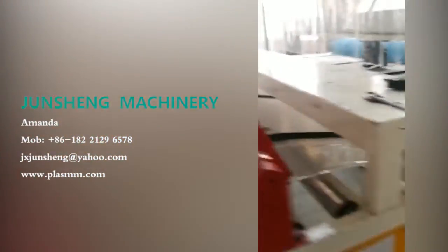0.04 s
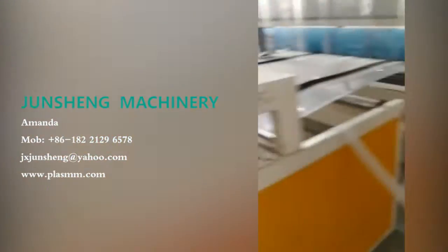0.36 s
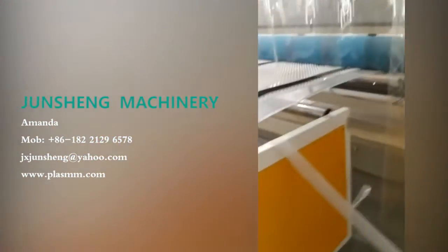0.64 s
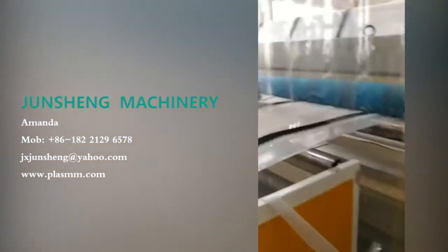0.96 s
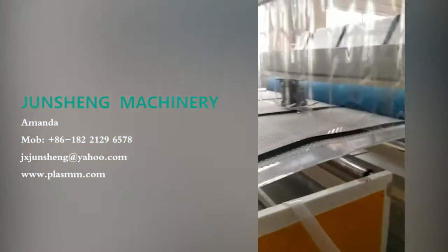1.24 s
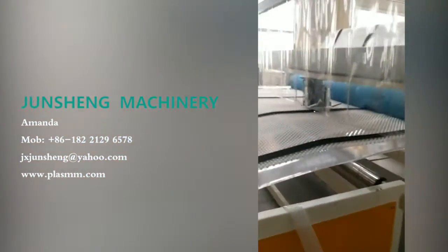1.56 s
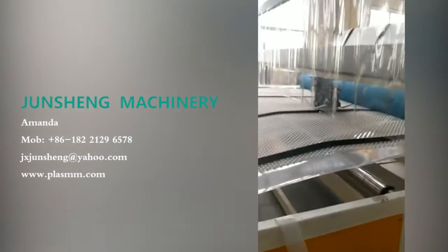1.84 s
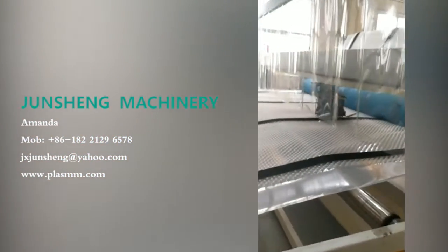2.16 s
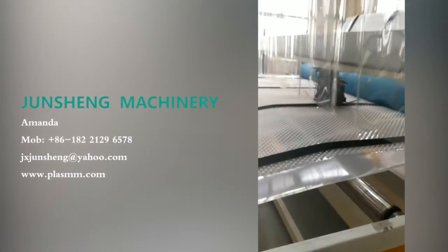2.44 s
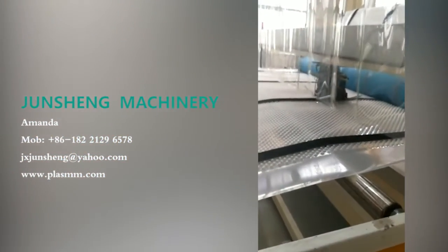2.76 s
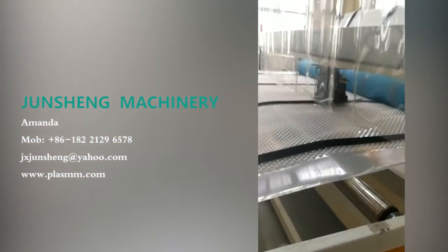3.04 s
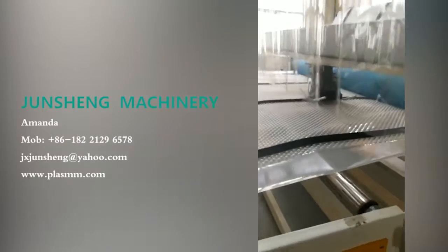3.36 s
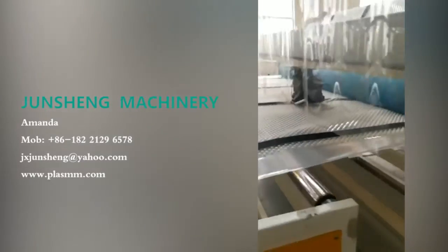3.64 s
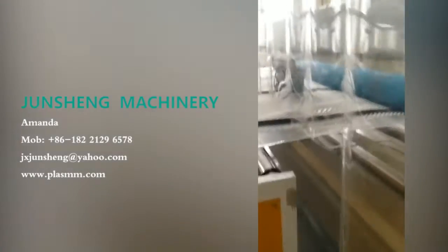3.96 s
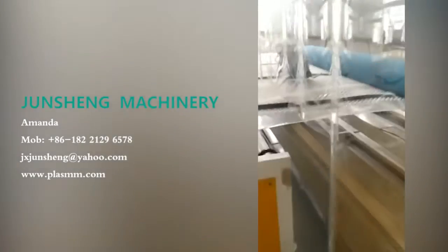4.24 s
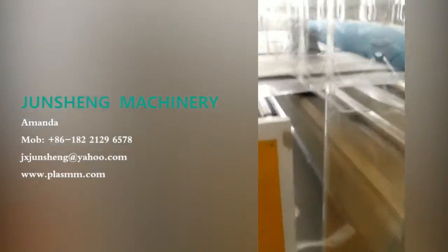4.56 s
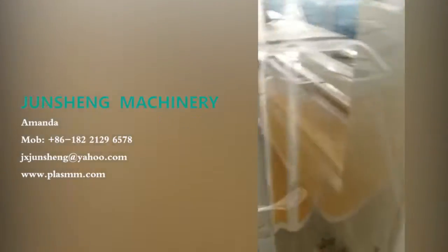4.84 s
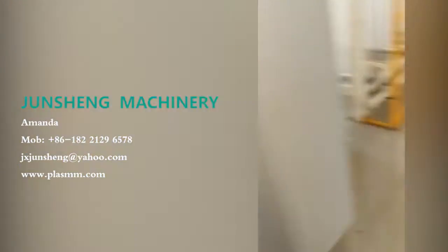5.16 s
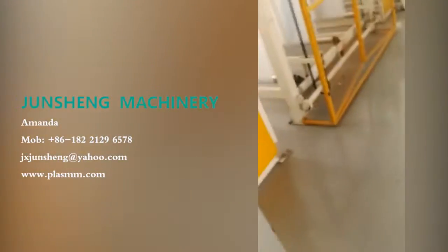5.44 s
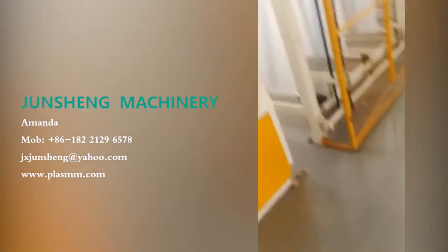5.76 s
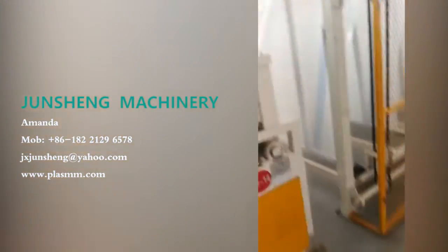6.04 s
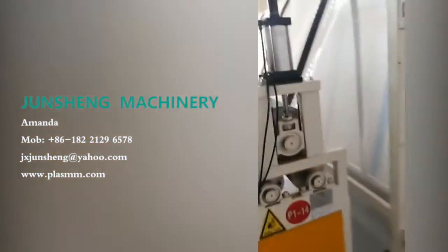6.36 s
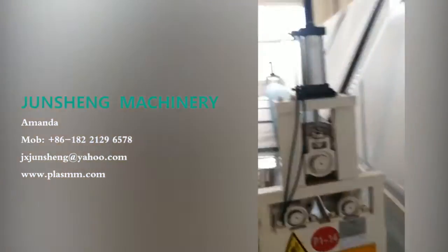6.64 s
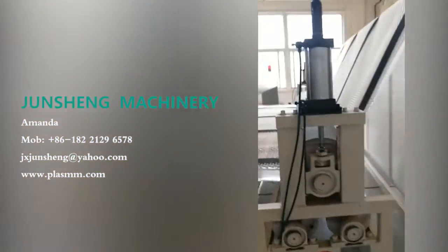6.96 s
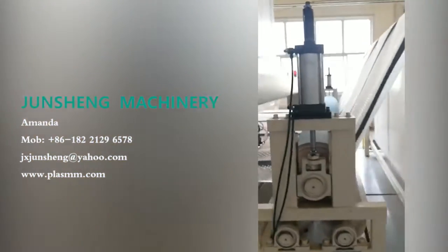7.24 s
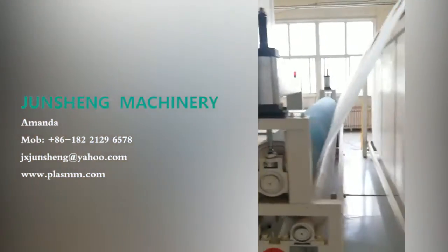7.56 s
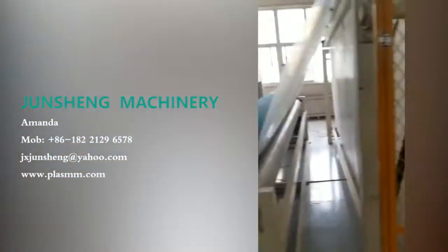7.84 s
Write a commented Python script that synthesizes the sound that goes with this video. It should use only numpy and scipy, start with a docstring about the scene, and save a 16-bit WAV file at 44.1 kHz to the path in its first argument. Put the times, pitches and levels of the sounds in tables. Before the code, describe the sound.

A machine making plastic sheet runs in a factory hall for about eight seconds, heard from a phone carried alongside it, a little louder on the left. From the start, fans roar evenly and the sheet hisses with a fine crinkle as it peels off rollers. Underneath, the machine's body rumbles, a gearbox drones with a slight throb and motors hum. A thin, slightly rough high whine continues throughout, flickering in strength and shifting between left and right. Dull knocks come at about 0.2, 0.6 and 1.7 seconds, with the loudest at 3.2. A blower tone swells around three seconds, and a guard rings briefly near four as the drone grows. At about five seconds the microphone turns away and the hiss drops clearly. Softer knocks follow near 5.6 and 6.2 seconds, while the roar, hum and whine carry on to the end.

```python
"""A phone is carried along a machine that makes plastic sheet in a factory hall. From the start, fans
roar, the sheet hisses and crinkles over rollers, the frame rumbles, a gearbox drones, motors hum and a
drive whines thinly. A few dull knocks follow, the loudest just after three seconds. Near four seconds
a guard rings, then the phone passes a side panel. At about five seconds it turns away from the sheet,
so the hiss drops while the machines run on."""
import sys
import numpy as np
from scipy import signal
from scipy.fft import rfft, irfft
from scipy.io import wavfile
from scipy.ndimage import uniform_filter1d

SR = 44100
rng = np.random.default_rng(int(sys.argv[2]) if len(sys.argv) > 2 else 0)


def unload_wav(signal):
    """Save mono or channel-first audio to the path in sys.argv[1] as 16-bit WAV at rate SR, clipped to [-1, 1]."""
    wavfile.write(
        sys.argv[1],
        SR,
        np.round(np.clip(np.atleast_2d(signal).T, -1, 1) * 32767).astype(np.int16),
    )


N = 348390
T = np.arange(N) / SR
BINS = np.arange(N // 2 + 1) * SR / N  # the frequencies of a spectrum, in Hz
SIDES = np.array([[1], [-1]])  # left, right
TOP_HZ = 7500

# How alike the two microphones hear the hall. Each row: frequency in Hz, likeness (1 same, -1 opposite).
LIKENESS = [(30, 1), (110, 1), (140, .998), (190, .988), (280, .85), (380, .5), (450, 0), (530, -.46),
            (660, -.38), (900, .05), (1350, .37), (1750, .15), (2050, -.15), (2500, -.22), (3000, .2),
            (3450, .22), (4000, -.12), (5000, .02)]
# How much louder the left side is. Each row: frequency in Hz, left minus right in dB.
LEAN = [(180, 0), (310, .6), (500, 2), (620, 3.6), (1100, 1.5), (1700, 4), (3000, 4.7), (3800, 4.3),
        (5000, 5), (7500, 4.6)]


def undb(db):
    """Turn decibels into a number to multiply by."""
    return 10 ** (np.asarray(db) / 20)


def curves(table):
    """Join the points of a time table with straight lines, one value a sample."""
    s, *columns = np.transpose(table)
    return np.squeeze([np.interp(T, s, c) for c in columns])


def at(table, hz):
    """Look up a frequency table, giving every octave the same width."""
    f, value = np.transpose(table)
    return np.interp(np.log(hz + 1e-9), np.log(f), value)


def unit(x):
    """Scale a signal to an average power of 1."""
    return x / np.sqrt(np.mean(x ** 2))


def walk(rate):
    """A smooth random wobble of size 1, moving up to about rate times a second."""
    smoothing = np.exp(-(BINS / rate) ** 2 / 2)
    return unit(irfft(rfft(rng.standard_normal(N)) * smoothing, N))


def in_hall(pair, gain):
    """Blend two noises into one hall sound: shaped by gain, alike in the bass, louder on the left."""
    mid, side = rfft(pair) * gain
    alike = np.clip(at(LIKENESS, BINS), -1, 1)
    both = mid * np.sqrt(1 + alike) + SIDES * side * np.sqrt(1 - alike)
    return unit(irfft(both * undb(SIDES * at(LEAN, BINS) / 2), N))


def turbulence(colour, flutter_db, rate):
    """A rushing noise in which each octave flutters on its own."""
    octave = np.log2(np.maximum(BINS, 1) / TOP_HZ)
    white, out = rfft(rng.standard_normal((2, N))), 0
    for k in range(9):
        band = irfft(white * np.maximum(1 - abs(octave + k), 0), N)
        out = out + band * undb(flutter_db * walk(rate))
    return in_hall(out, undb(at(colour, BINS)))


def tone(hz, scatter, rate, spread=1):
    """A steady tone plus its echoes, whose sum shifts as the phone moves."""
    mid, side = (1 + scatter * (walk(rate) + 1j * walk(rate)) for _ in range(2))
    alike = np.clip(at(LIKENESS, hz), -1, 1)
    both = mid * np.sqrt(1 + alike) + 1j * SIDES * spread * side * np.sqrt(1 - alike)
    carrier = np.exp(2j * np.pi * (hz * T + rng.random()))
    return unit((both * carrier).real * undb(SIDES * at(LEAN, hz) / 2))


def swelling(swells, rest_db, rest_lean_db):
    """A tone's left and right gain as the phone crosses the loud and quiet spots of standing waves."""
    gain = undb(rest_db + SIDES * rest_lean_db / 2)
    for s, length_s, db, lean_db in swells:
        inside = np.exp2(-np.abs(2 * (T - s) / length_s) ** 3)
        target = undb(db) * unit(undb(SIDES * lean_db / 2))
        gain = gain + inside * (target - gain)
    return gain


def fans(low_db=-30.5, split_hz=410):
    """Cooling fans fill the hall with an even roar; only its upper part changes as the phone moves."""
    # The roar's tone colour. Each row: frequency in Hz, relative strength in dB.
    colour = [(25, -7), (60, 1.5), (150, -1.5), (330, 0), (410, 5.5), (510, -0.5), (620, 3.5), (730, 0.5),
              (900, 2.5), (1400, -1), (2100, -3), (3200, -6), (5500, -10), (7500, -22.5)]
    # The roar's upper part. Each row: time in seconds, level in dB.
    upper_levels = [(0, -29.5), (.6, -30), (1.5, -29.5), (2.7, -30), (3.5, -29), (4.05, -30.5),
                    (4.5, -30.5), (5.1, -32.5), (5.55, -31.5), (5.9, -32), (7.9, -32.5)]
    roar = turbulence(colour, flutter_db=.7, rate=18)
    low = irfft(rfft(roar) / (1 + (BINS / split_hz) ** 6), N)
    return low * undb(low_db) + (roar - low) * undb(curves(upper_levels))


def sheet(facing_db=-30.5, away_db=-40, turn_s=4.82, turn_length_s=0.4,
          crinkles_per_s=120, crinkle_db=-14, fizz_s=0.0028):
    """The sheet hisses and crinkles as it peels off the rollers, more softly once the phone turns away."""
    # The sheet's tone colour. Each row: frequency in Hz, relative strength in dB.
    colour = [(500, -28.5), (1200, -17.5), (2200, -3.5), (3100, 0), (3700, -2), (4400, -5), (5400, -5),
              (5900, -2.5), (6500, 3), (7050, 5.5), (7500, 2)]
    hiss = turbulence(colour, flutter_db=.45, rate=14)
    snaps = (rng.random(N) < crinkles_per_s / SR) * rng.exponential(size=N)
    # each snap leaves a short, fading fizz
    power = signal.lfilter([1], [1, -np.exp(-1 / (fizz_s * SR))], snaps + 1e-18)
    crinkle = in_hall(np.sqrt(power) * rng.standard_normal((2, N)), undb(at(colour, BINS)))
    turned = np.clip((T - turn_s) / turn_length_s, 0, 1)
    db = facing_db + turned * (away_db - facing_db) + .2 * walk(16)
    return (hiss + undb(crinkle_db) * crinkle) * undb(db)


def churning(x, band_hz=130, swell_s=.035):
    """Make a rush sound coarse: narrow bands swell for a moment and sink back, each on its own."""
    # How far the bands swell and fade. Each row: frequency in Hz, typical swing in dB.
    swings = [(300, .6), (550, 1.4), (1000, .7), (1600, 1.3), (2300, 1.8), (4000, 1.8), (7000, 1.3)]
    hz, s, bands = signal.stft(x, SR, nperseg=1024)
    chance = rng.standard_normal((len(hz), len(s)))
    for size, axis in ((round(band_hz / hz[1]), 0), (round(swell_s / s[1]), 1)):
        chance = uniform_filter1d(uniform_filter1d(chance, size, axis=axis), size, axis=axis)
    gain = undb(at(swings, hz)[:, None] * unit(chance))
    gain = gain / np.sqrt(np.mean(gain ** 2, axis=1, keepdims=True))
    return signal.istft(bands * gain, SR)[1][:, :N]


def surfaces(x, delays_s=(.0037, .0083, .0141), sway_s=.00022, echo=0.15):
    """Echoes bounce off the floor and machines; their paths shift as the phone moves."""
    out = x
    for delay_s in delays_s:
        then = T - delay_s - sway_s * walk(0.67)
        out = out + echo * np.array([np.interp(then, T, channel) for channel in x])
    return out


def frame(hum_boost_db=0.2):
    """Rollers shake the frame; hums from shafts and mains power swell with the rumble."""
    # The frame's rumble. Each row: time in seconds, level in dB.
    levels = [(0, -36.5), (.42, -38), (.62, -36.5), (1.68, -36.5), (1.86, -44), (2.35, -37), (3.15, -41),
              (3.8, -43), (4.1, -36), (4.65, -37.5), (4.92, -32.5), (5.1, -39.5), (6.9, -40.5),
              (7.9, -40.5)]
    # Its tone colour. Each row: frequency in Hz, relative strength in dB.
    colour = [(100, -9.5), (150, -6), (190, -2), (280, -1.5), (350, -10.5), (480, -21), (1000, -45.5)]
    # Other machines' hums. Each row: pitch in Hz, base level in dB, share of the rumble's swell (0-1).
    hums = [(48.7, -48.5, 0), (182.3, -49, 1), (222.5, -49.5, .9), (249.5, -53, .8), (264, -53, .5),
            (275.6, -51.5, .5), (336, -54, .5), (599.6, -50.5, .1), (877, -55, 0), (899, -57, 0),
            (1199, -57.5, 0), (1383, -58, 0)]
    db = curves(levels)
    out = turbulence(colour, flutter_db=-0.4, rate=1.3) * undb(db)
    for hz, base_db, share in hums:
        hum_db = base_db + hum_boost_db + share * (db - db.mean())
        out = out + tone(hz, scatter=.4, rate=0.62) * undb(hum_db)
    return out


def gearbox(tones_db=-1, churn_db=-7.0):
    """Turning shafts drone over a dull churn; two close pitches throb against each other."""
    # The whole drone. Each row: time in seconds, level in dB.
    levels = [(0, -39), (.7, -40.5), (1.6, -40), (3.2, -38), (3.6, -34.5), (4.56, -33), (4.72, -44.5),
              (5.55, -40.5), (7.1, -43.5), (7.9, -45)]
    # The shafts' tones. Each row: pitch in Hz, relative level in dB.
    shafts = [(74, -17), (99.6, -7.5), (144.3, -8), (148, -5), (178, -11), (200, -14)]
    # The churn's tone colour. Each row: frequency in Hz, relative strength in dB.
    colour = [(30, -17), (65, -13.5), (100, 1.5), (125, 2), (150, 3), (190, -10), (400, -48)]
    tones = sum(tone(hz, scatter=0.25, rate=2.2) * undb(db) for hz, db in shafts)
    churn = turbulence(colour, flutter_db=0.5, rate=6.9)
    return (undb(tones_db) * tones + undb(churn_db) * churn) * undb(curves(levels))


def motors(motor_hz=299.6, blower_hz=825.6, guard_hz=600):
    """The main motor hums, the blower's blades sing, and together they set a guard ringing."""
    # The magnetic hum, at six times the mains frequency. Each row: time in seconds, level in dB.
    motor_levels = [(0, -47), (.25, -49), (.42, -53), (.6, -37.5), (.74, -31.5), (1.08, -35.5), (1.25, -38),
                    (1.42, -36), (1.53, -37), (1.68, -31), (1.88, -40.5), (2.5, -41.5), (3.2, -38.5),
                    (3.3, -40), (3.6, -55), (3.85, -39), (4.55, -36), (4.8, -33), (4.97, -40.5),
                    (5.15, -38), (5.45, -42.5), (5.58, -51), (5.9, -53), (6.12, -40), (6.55, -41),
                    (6.8, -46), (7.35, -40), (7.62, -37.5), (7.9, -45.5)]
    # How that hum differs left and right. Each row: time in seconds, spread (1 = as from all around).
    motor_spread = [(0, 0.36), (3.5, 1.3), (4.6, .2), (5.2, 0.46), (5.8, 2.3), (7.9, 1.6)]
    # The blower's loud spots.
    # Each row: middle in seconds, length in seconds, level in dB, left minus right in dB.
    blower_swells = [(0.167, 0.2, -46, 21), (.68, .14, -45.5, 10), (1.1, 0.16, -44, -4),
                     (1.462, 0.11, -48, 12), (2.35, 0.091, -39, 0), (2.691, 0.15, -38.5, -7),
                     (3.068, 0.21, -34.5, -1), (3.424, 0.36, -41.5, 3), (3.857, 0.13, -44, -7),
                     (4.169, 0.08, -39, -5), (4.46, 0.3, -43, 12), (4.73, .12, -46, 5),
                     (5.05, .2, -46.5, 1), (5.42, 0.25, -41.5, -5), (5.636, 0.089, -43.5, 16),
                     (5.92, 0.34, -48, -3), (6.74, 0.26, -43, 2), (7.344, 0.15, -40.5, 16),
                     (7.57, 0.2, -47, 12), (7.8, 0.18, -46, 12)]
    # The guard, heard only from close by. Each row: time in seconds, level in dB.
    guard_levels = [(0, -55.5), (3.4, -61), (3.8, -39.5), (4.15, -44), (4.45, -62), (7.9, -52.5)]
    motor = tone(motor_hz, scatter=.16, rate=4.5, spread=curves(motor_spread))
    blower = tone(blower_hz, scatter=.08, rate=12.0)
    guard = tone(guard_hz, scatter=5.9, rate=10.0)
    return (motor * undb(curves(motor_levels))
            + blower * swelling(blower_swells, rest_db=-52, rest_lean_db=0)
            + guard * undb(curves(guard_levels)))


def drive(whine_hz=2659.5, wander_hz=1.524, rough_db=-13, echo_db=-59):
    """The drive's thin, slightly rough whine reaches the microphones out of step, over a wavering echo."""
    # The whine's loud and quiet spots.
    # Each row: middle in seconds, length in seconds, level in dB, left minus right in dB.
    swells = [(0.157, 0.082, -37, 22), (0.237, 0.06, -48, -2), (0.395, 0.077, -38.5, 27),
              (0.564, 0.14, -37, 15), (0.781, 0.12, -44, -8), (1.07, 0.07, -37.5, 18),
              (1.171, 0.077, -34.5, 19), (1.33, .12, -43, 6), (1.544, 0.09, -39, 20),
              (1.735, 0.07, -46, -12), (1.873, 0.097, -42.5, -8), (2.38, 0.22, -43.5, 13),
              (2.613, 0.081, -41.5, 11), (2.729, 0.11, -43, -13), (2.93, 0.11, -43, 5),
              (3.062, 0.099, -37, 15), (3.35, 0.08, -38, 20), (3.44, 0.055, -54, -2), (3.52, 0.07, -43, 14),
              (3.63, 0.05, -52, 0), (3.69, 0.17, -42.5, 21), (3.989, 0.088, -31.5, 28),
              (4.09, 0.1, -36.5, 27), (4.208, 0.08, -48, 6), (4.337, 0.1, -40, -7),
              (4.412, 0.076, -37.5, 17), (4.55, 0.075, -34, 14), (4.633, 0.04, -50, 0),
              (4.734, 0.12, -38, 4), (4.95, 0.084, -41.5, -4), (5.058, 0.08, -52, 9),
              (5.22, 0.18, -39.5, 14), (5.38, .1, -45, -3), (5.536, 0.14, -36.5, 25),
              (5.72, 0.074, -37, -28), (5.843, 0.11, -32.5, 3.5), (5.945, 0.03, -36, -20),
              (6.03, 0.15, -39.5, 25), (6.195, 0.18, -45, -12), (6.31, 0.08, -49, 3),
              (6.375, 0.045, -51, -10), (6.465, 0.11, -37, 12), (6.587, 0.1, -39, 12),
              (6.674, 0.064, -47, -14), (6.767, 0.11, -35, 30), (6.855, .05, -41, 15),
              (6.932, 0.06, -53, 7), (7.07, 0.05, -45, 14), (7.14, 0.09, -37, -25),
              (7.264, 0.09, -34.5, 25), (7.41, 0.072, -54, 5), (7.513, 0.16, -41, 33),
              (7.6, 0.036, -46, -15), (7.7, 0.17, -37, -2), (7.804, 0.06, -40.5, 7), (7.894, 0.05, -39, 18)]
    phase = 2 * np.pi * np.cumsum(whine_hz + wander_hz * walk(1.62)) / SR
    paths = SIDES * 0.45 + 0.65 * walk(2.5)  # radians, from the microphones' spacing and movement
    roughness = undb(rough_db) * np.array([walk(27) + 1j * walk(35) for _ in range(2)])
    direct = unit(((1 + roughness) * np.exp(1j * (phase + paths))).real)
    echo = tone(whine_hz, scatter=10, rate=9) * undb(echo_db)
    return direct * swelling(swells, rest_db=-47.5, rest_lean_db=8) + echo


def knocks(rise_s=0.0039):
    """Dull knocks, blurred by the hall; the low ones ring briefly in the frame."""
    # Knocks on the frame. Each row: start in seconds, level in dB before the rise and fade,
    # pitch in Hz, fade time in seconds, share that rings (0-1).
    hits = [(.222, -26, 295, 0.024, 0.72), (.625, -24, 251, .022, 0.9), (1.66, -35, 725, 0.073, 0),
            (3.192, -19.5, 333, 0.009, 0.7), (5.565, -32.5, 3060, 0.024, 0.1), (5.584, -28, 780, 0.023, 0),
            (6.16, -28, 183, 0.015, 0.8)]
    out = 0
    for s, db, hz, decay_s, rings in hits:
        age = np.maximum(T - s, 0)
        thud = in_hall(rng.standard_normal((2, N)), np.exp(-np.log2((BINS + 1) / hz) ** 2))
        body = rings * np.sqrt(2) * np.sin(2 * np.pi * hz * age) + (1 - rings) * thud
        out = out + body * undb(db) * (1 - np.exp(-age / rise_s)) * np.exp(-age / decay_s)
    return out


def past_panel(x, node_hz=512, width_hz=88, lift=.45):
    """In one band, a standing wave by a panel fades what both microphones share and lifts the rest."""
    # Passing the side panel. Each row: time in seconds, nearness (0-1).
    nearness = [(3.7, 0), (4.3, 0.3), (4.42, .68), (4.62, 0.92), (5.0, 0.82), (5.15, .15)]
    band = irfft(rfft(x) * np.exp(-((BINS - node_hz) / width_hz) ** 4), N)
    common = band.mean(axis=0)
    near = curves(nearness)
    near = near + (1 - near) * 0.22 * walk(8)  # farther off, the effect comes and goes
    return x + near * (lift * (band - common) - common)


def scene():
    """All parts of the machine run at once."""
    rush = surfaces(churning(fans() + sheet()))
    return past_panel(rush + frame() + gearbox() + motors() + drive() + knocks())


def record(dry, low_cut_hz=33):
    """The phone thins the deepest bass and cuts the highest treble steeply."""
    thinned = signal.sosfilt(signal.butter(2, low_cut_hz, "high", fs=SR, output="sos"), dry)
    return signal.sosfilt(signal.ellip(14, .1, 90, TOP_HZ, fs=SR, output="sos"), thinned)


dry = scene()
out = record(dry)
unload_wav(out)
```